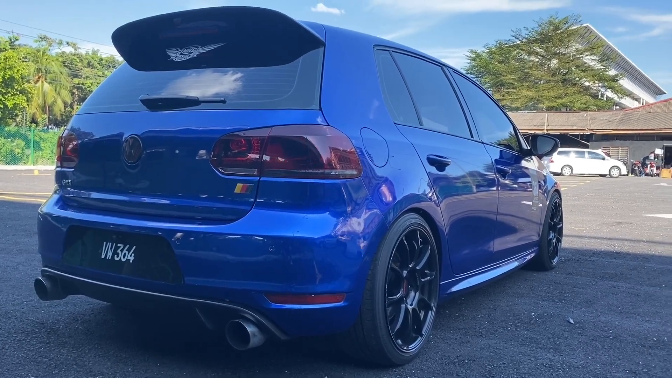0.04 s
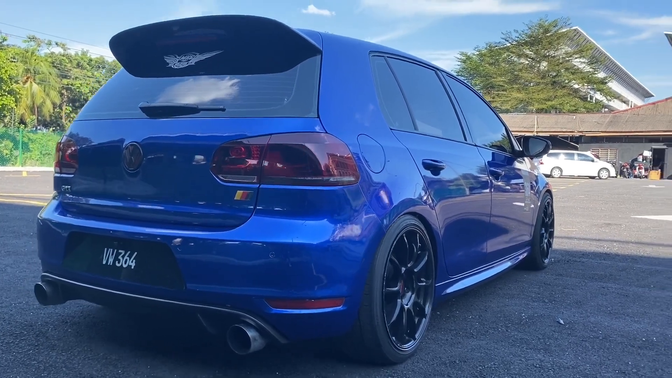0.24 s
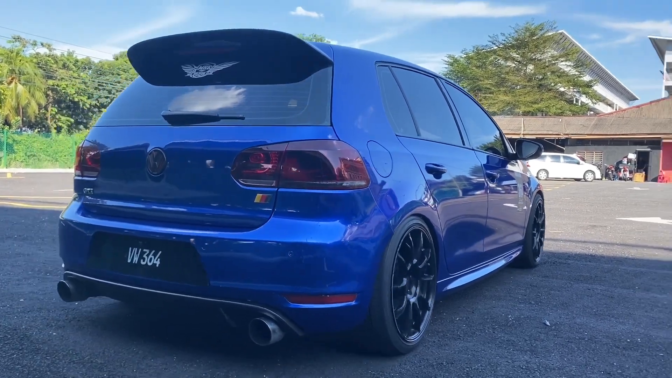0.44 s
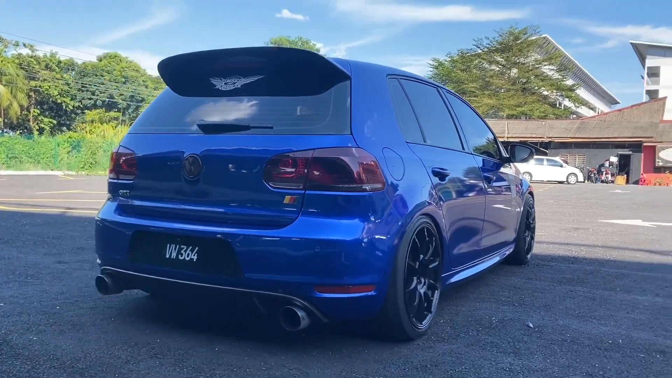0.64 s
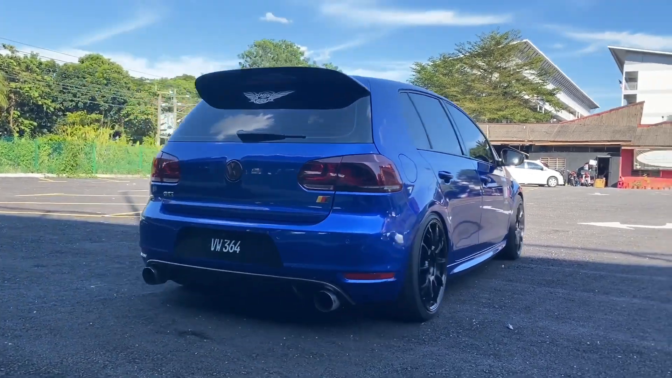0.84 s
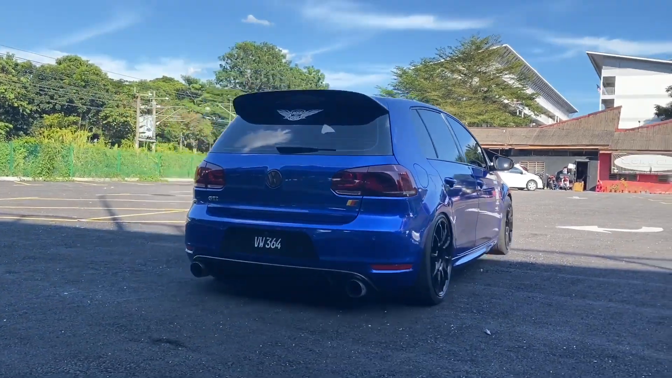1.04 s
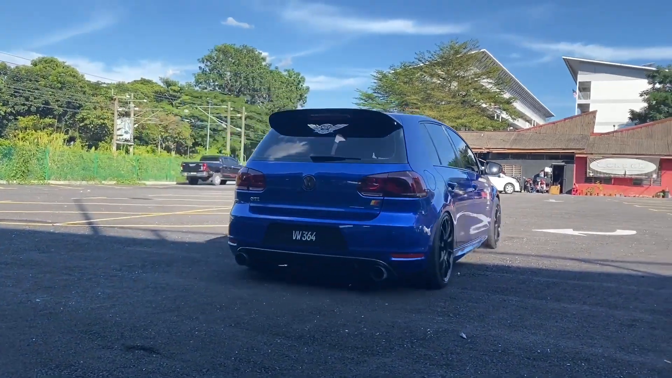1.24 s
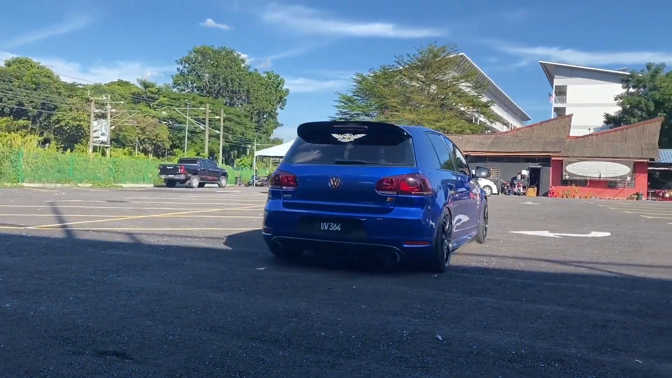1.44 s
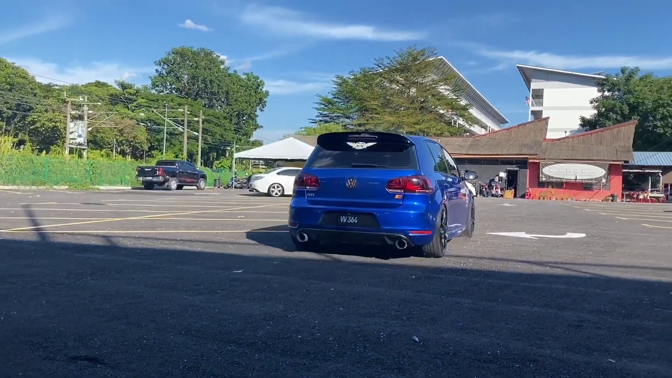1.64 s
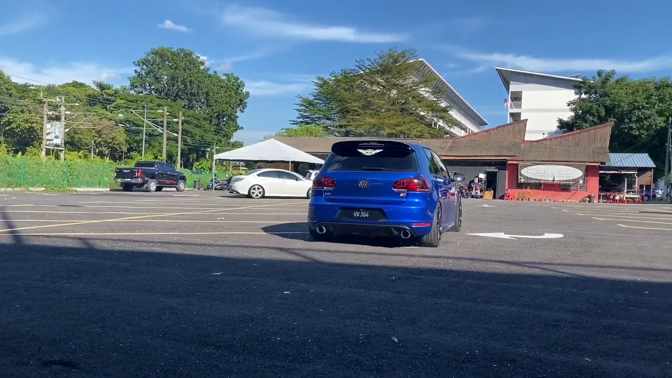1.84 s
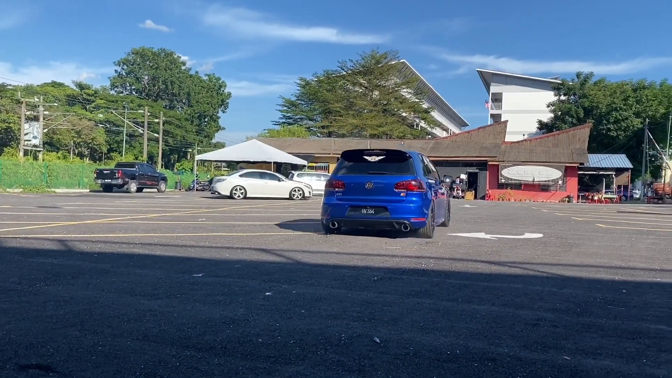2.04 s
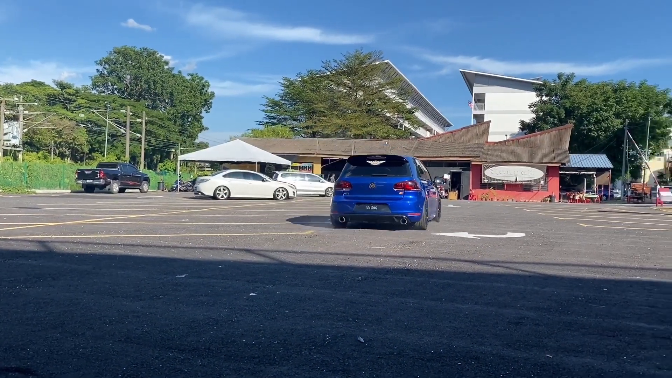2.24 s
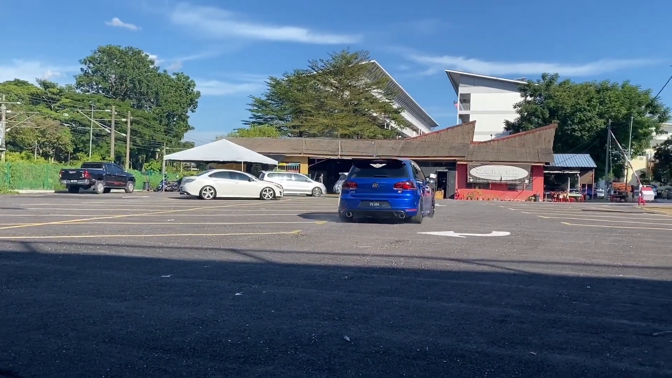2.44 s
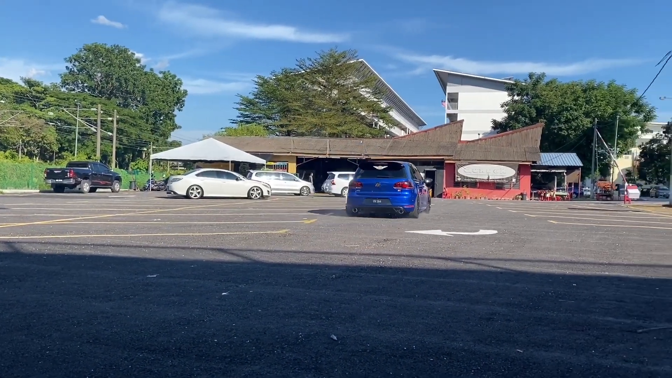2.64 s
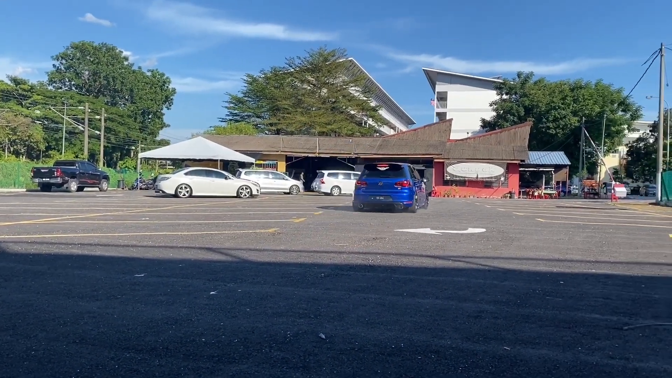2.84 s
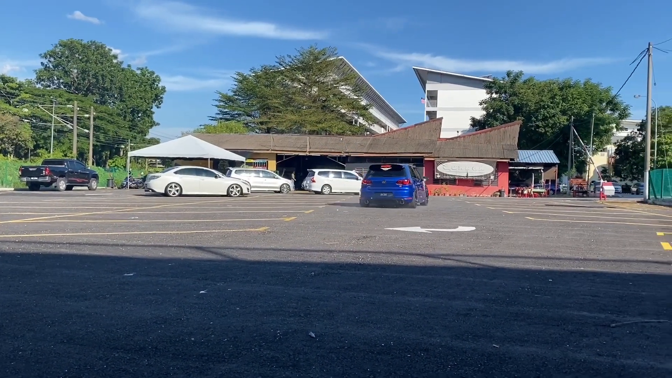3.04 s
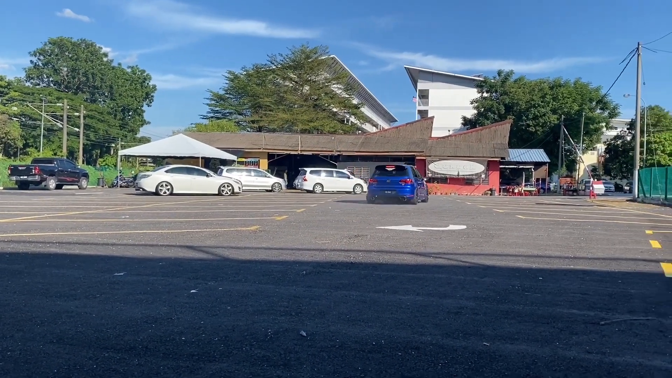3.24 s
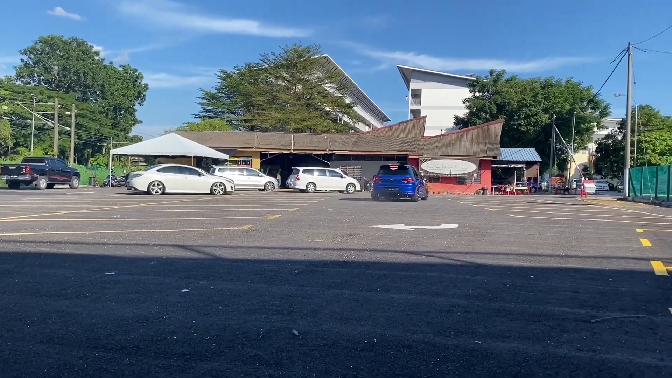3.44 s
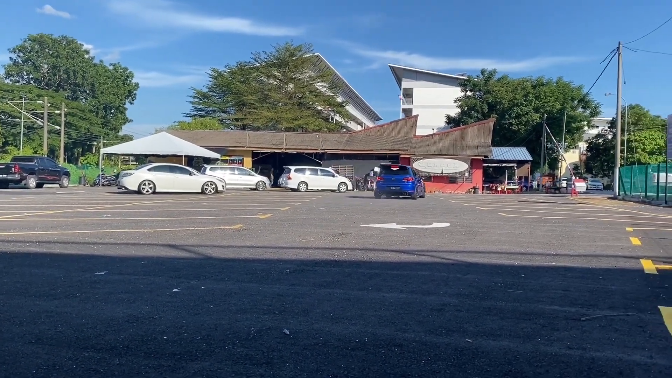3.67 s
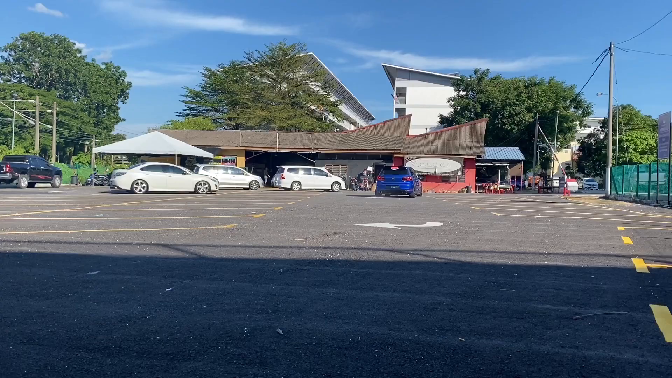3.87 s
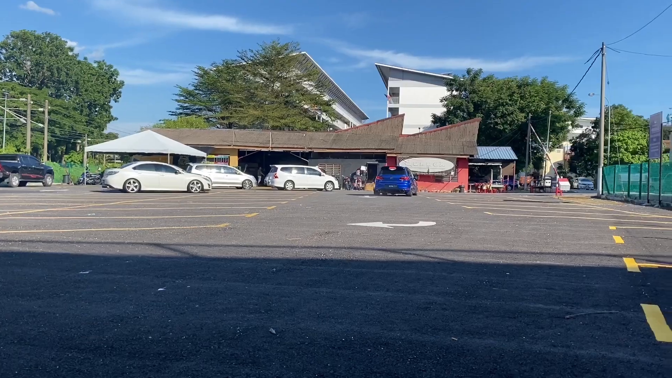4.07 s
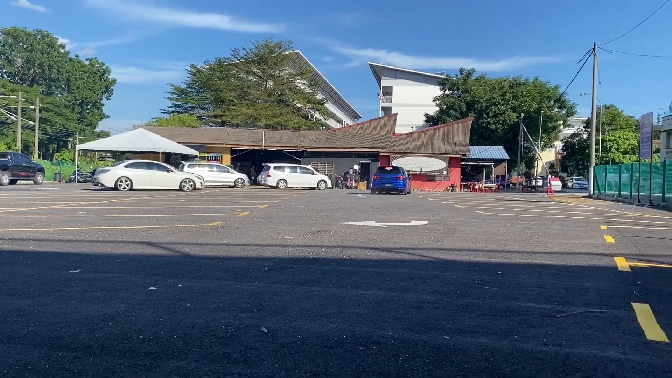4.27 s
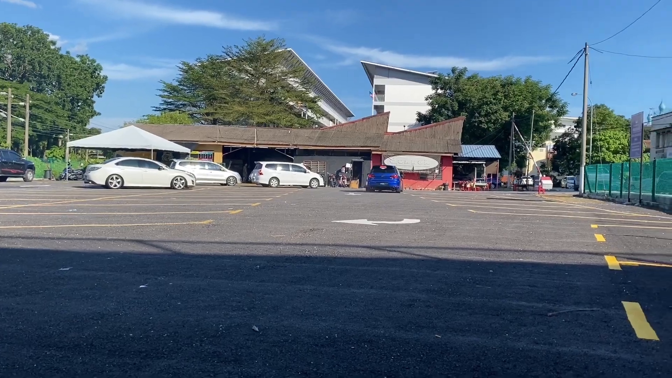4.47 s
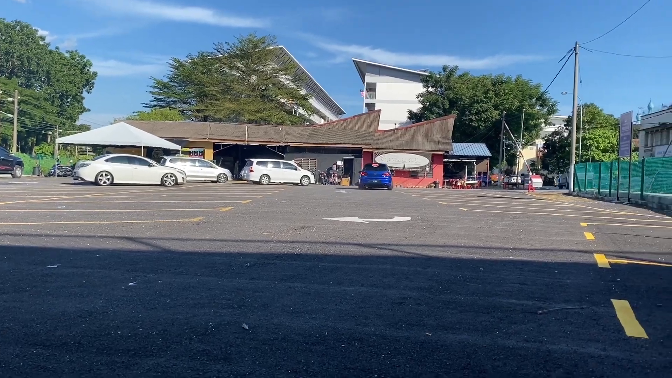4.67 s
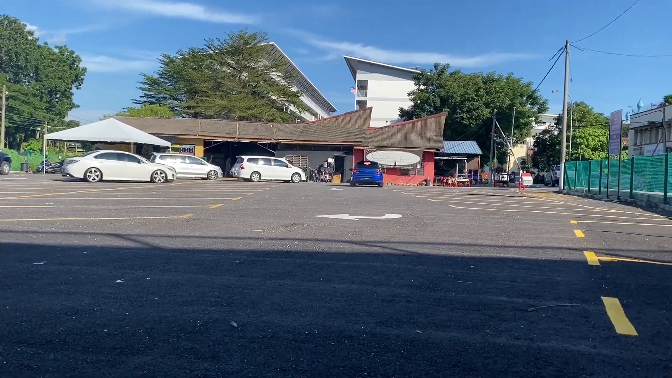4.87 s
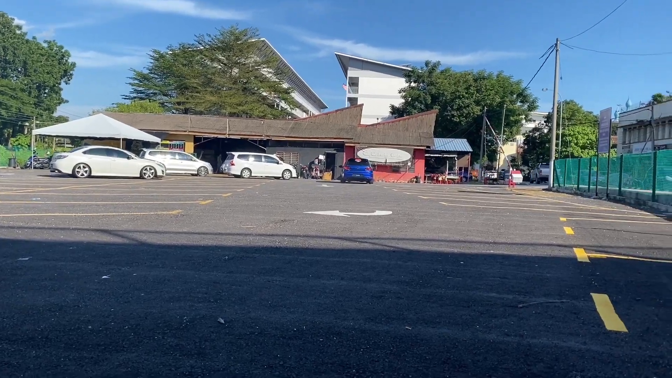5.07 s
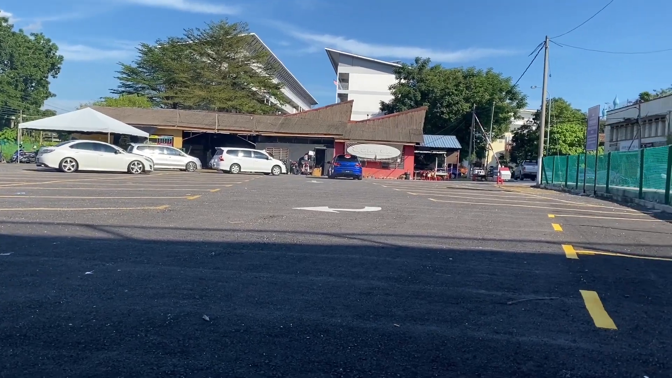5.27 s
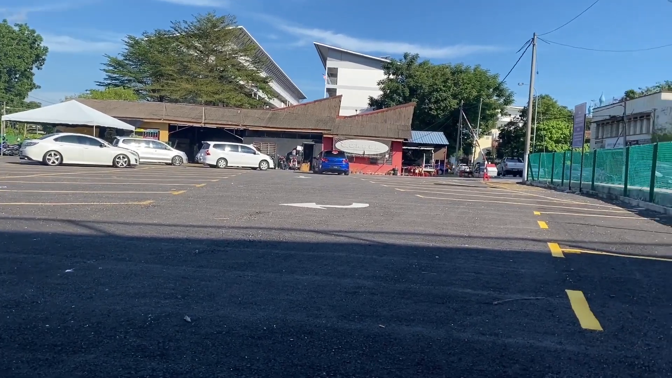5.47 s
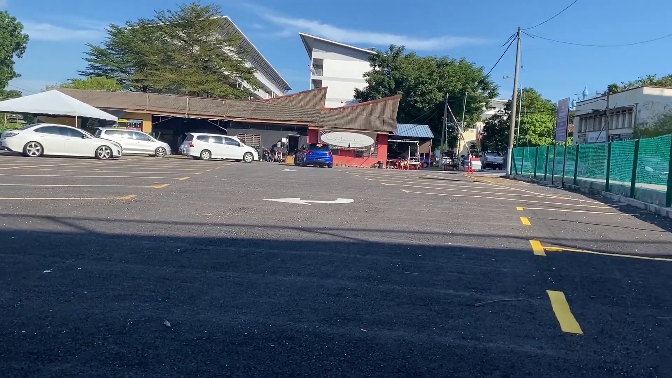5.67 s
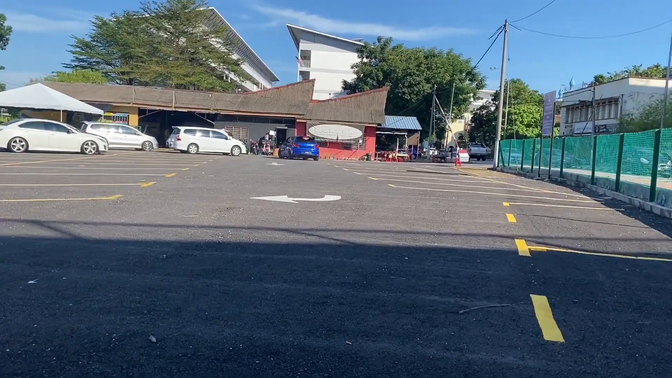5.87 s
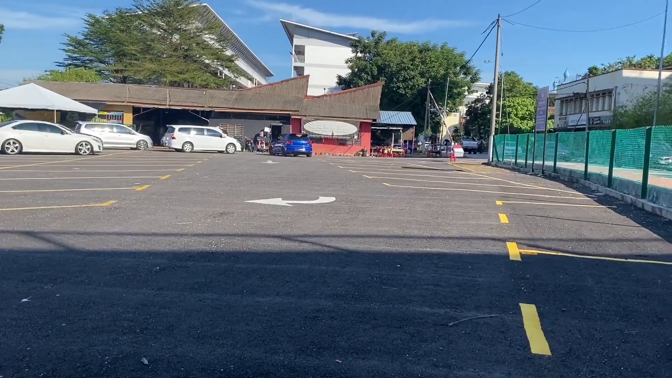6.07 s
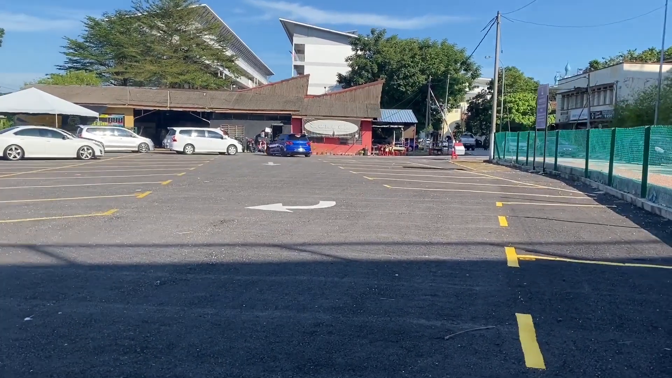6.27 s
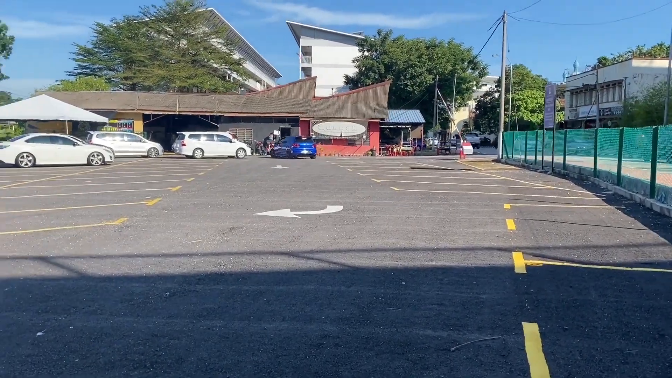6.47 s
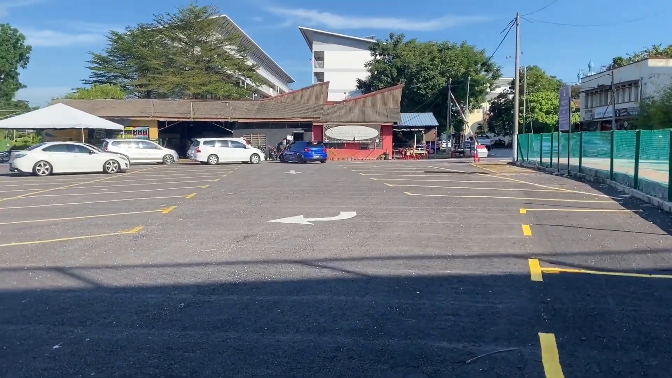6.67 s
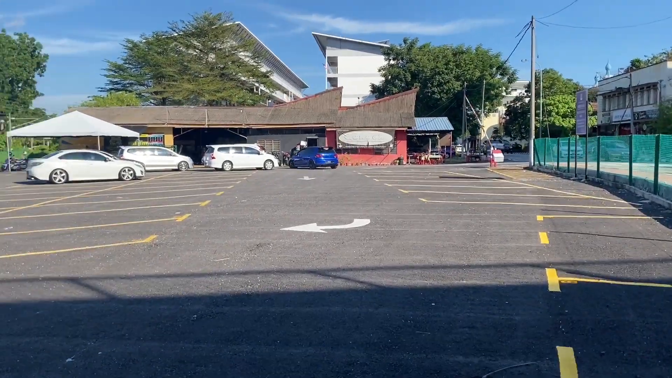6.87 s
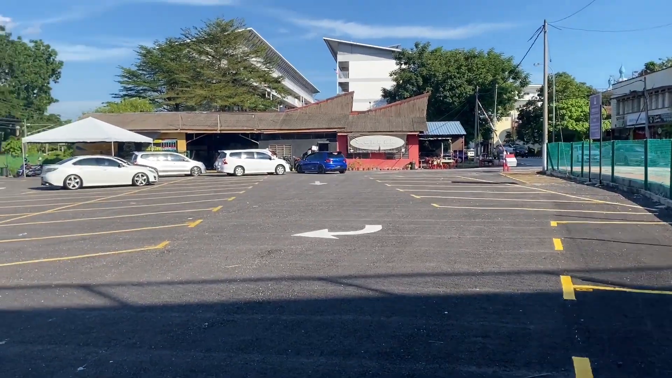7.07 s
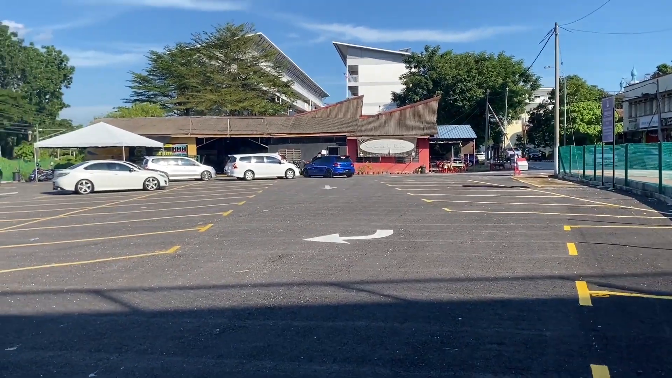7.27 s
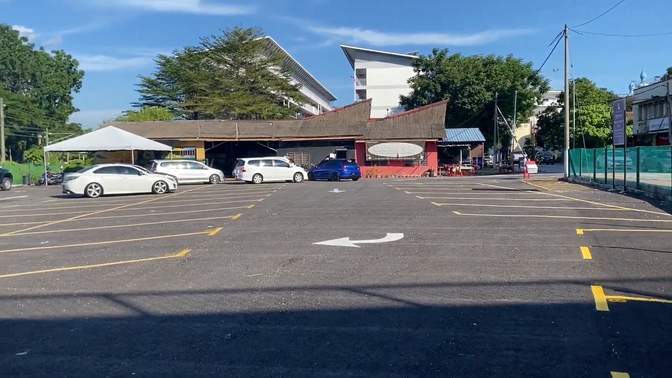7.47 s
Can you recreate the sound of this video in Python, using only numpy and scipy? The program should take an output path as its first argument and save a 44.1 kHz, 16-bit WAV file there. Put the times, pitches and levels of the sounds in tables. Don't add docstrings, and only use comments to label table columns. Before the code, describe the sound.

Outdoors in an open asphalt car park, a handheld phone picks up a four-cylinder turbo car very close. Its open exhaust booms and rasps, spitting gas as revs climb over nearly three seconds and the car recedes. The throttle shuts, the pitch falls into a dull drone with a faint sinking turbo whistle, then a tiny distant idle under soft traffic rumble. A shoe scuffs nearby at the end.

```python
import sys
import numpy as np
from scipy import signal
from scipy.fft import rfft, irfft
from scipy.io import wavfile
from scipy.ndimage import uniform_filter1d

SR = 44100
rng = np.random.default_rng(int(sys.argv[2]) if len(sys.argv) > 2 else 0)


def master_out(mix):
    frames = np.transpose(np.atleast_2d(mix))
    ceiling = np.clip(frames, -1, 1)
    pcm = np.round(ceiling * 32767).astype(np.int16)
    wavfile.write(sys.argv[1], SR, pcm)


def to_linear_factor(level_db):
    exponent = np.asarray(level_db, float) / 20
    return 10 ** exponent


N = 331214
T = np.arange(N) / SR
HZ = np.fft.rfftfreq(N, 1 / SR)
SWING_S, LIFT_OFF_S = (0.69, 1.1), (3.1, 4.3)

# (time [s], gas gating [0-1], clean pulse share [0-1])
CRISP = [
    (0, .6, .42),
    (.25, .78, .45),
    (.6, .82, .62),
    (1., .75, .62),
    (1.4, .62, .62),
    (2.2, .52, .7),
    (2.9, .45, .45),
    (3.4, .25, .1),
]
# (middle [s], length [s], rasp [dB], jet [dB])
SURGES = [
    (0.37, .1, 4, -3),
    (0.794, 0.21, 3.5, 5),
    (.98, 0.057, -2, 10),
    (1.108, 0.12, 0, 6.5),
    (1.236, 0.51, 10.5, 7),
    (1.7, 0.12, 7.5, 4),
    (1.852, .04, 6, 11.5),
]


def curves(table):
    s, *columns = np.transpose(table)
    return [np.interp(T, s, c) for c in columns]


def over_hz(table):
    f, v = np.transpose(table)
    return np.interp(np.log(HZ + 1), np.log(f + 1), v)


def unit(x):
    return x / np.sqrt(np.mean(x ** 2))


def colour(x, table):
    return unit(irfft(rfft(x) * to_linear_factor(over_hz(table)), N))


def noise():
    return rng.standard_normal(N)


def walk(rate):
    k = int(SR / rate)
    steps = np.repeat(rng.standard_normal(N // k + 1), k)
    return unit(uniform_filter1d(uniform_filter1d(steps, k), k)[:N])


def flicker(x, depth_db, rate):
    f, t, z = signal.stft(x, SR, nperseg=512)
    band = np.clip(3 * np.log2(f / 60 + 1), 0, 24).astype(int)
    at = np.minimum((t * SR).astype(int), N - 1)
    wander = np.array([walk(rate)[at] for _ in range(25)])
    return signal.istft(z * to_linear_factor(depth_db * wander[band]), SR)[1][:N]


def ramp(span):
    return np.interp(T, span, [0, 1])


def hold(db, span):
    return to_linear_factor(db) * np.interp(T, span, [0, 1, 1, 0]) ** 2


def bell(middle_s, length_s):
    return np.exp(-(2 * (T - middle_s) / length_s) ** 2)


def boom(turns, hz, tone_db, flow_db):
    # (frequency [Hz], level [dB])
    pipe_near = [(185, -4.5), (220, -5), (277, 16.5), (302, 3), (372, 8.5), (415, -0.5), (556, -1),
                 (650, -8)]
    pipe_far = [(120, 18), (210, 8.5), (300, 10.5), (390, 15), (460, 9), (700, 4), (820, -17), (1200, -15)]
    far_multiple_db = [0, -5.5, -7, -9.5, -12.5]
    ring_hz, ring_width_hz = 277, 90
    far, shut = ramp(SWING_S), ramp(LIFT_OFF_S)

    def read(table, f):
        table_hz, table_db = np.transpose(table)
        return np.interp(np.log(f), np.log(table_hz), table_db)

    def pipe_db(f):
        return flow_db + (1 - far) * read(pipe_near, f) + far * read(pipe_far, f)

    def lag(f):
        return np.arctan2(f * ring_width_hz, ring_hz ** 2 - f ** 2)

    whole_db = [tone_db]
    for k, db in enumerate(far_multiple_db):
        shut_drop_db = (0.99 + 6.5 * (k > 0)) * shut
        whole_db.append(pipe_db((k + 2) * hz) + far * db - shut_drop_db)
    out = np.zeros(N)
    for k, db in enumerate(whole_db):
        multiple = k + 1
        phase = 2 * np.pi * multiple * (turns - .3) - lag(multiple * hz)
        out += to_linear_factor(db + (.5 + 0.36 * k) * walk(12)) * np.cos(phase)

    half_db = -17 + 0.1279 * (hz - 100) - 2.9 * shut
    # (multiple, level [dB])
    for multiple, db in [(.5, -17.5), (1.5, -1.5), (2.5, -5.5), (3.5, -3.5), (4.5, -4.5), (5.5, 2)]:
        level_db = pipe_db(multiple * hz) + half_db + db + 2.4 * walk(12)
        out += to_linear_factor(level_db) * np.sin(2 * np.pi * (multiple * turns + rng.random()))
    return np.sqrt(2) * out * (1 - ramp((5.06, 5.2)))


def idle():
    # (middle [s], length [s], level [dB])
    idle_swells = [
        (5.097, 0.09, -38.5),
        (5.23, .1, -39.5),
        (5.401, 0.17, -37),
        (5.528, .1, -45.5),
        (5.789, .3, -38.5),
        (6.086, 0.53, -47.5),
        (6.815, 0.24, -38.5),
        (7.412, 0.34, -35),
    ]
    swell = to_linear_factor(-52.5) + sum(to_linear_factor(db) * bell(s, length_s) for s, length_s, db in idle_swells)
    turns = np.cumsum(63 + 1.84 * walk(6.4)) / SR
    return np.sqrt(2) * swell * ramp((4.9, 5.05)) * np.sin(2 * np.pi * turns)


def bounce(x, scale):
    # (time [s], spacing of the notches [Hz], share of the copy [0-1])
    asphalt = [
        (0, 681, 0.3),
        (.5, 702, 0.45),
        (1.1, 923, 0.6),
        (1.6, 1260, 0.09),
        (2.1, 1230, 0),
        (2.6, 1400, 0),
    ]
    spacing_hz, share = curves(asphalt)
    share = np.clip(share * scale, 0, 1)
    return (x - share * np.interp(T - 1 / spacing_hz, T, x)) / np.sqrt(1 + share ** 2)


def rasp(pulses, gate, gas_db):
    # (frequency [Hz], level [dB])
    rasp_spectrum = [(450, -71.5), (620, 2), (700, -1), (857, 4), (947, -5.5), (1160, -6.5), (1280, -17.5),
                     (1500, -13), (1950, -41.5), (3300, -120)]
    clean = curves(CRISP)[1]
    db = gas_db + 2 - 1.5 * (1 - ramp(SWING_S)) - 9.5 * ramp(LIFT_OFF_S) - 1.0 * T
    db = db + sum(rasp_db * bell(s, length_s) for s, length_s, rasp_db, _ in SURGES)
    mix = clean * pulses + (1.25 - clean) * gate * noise()
    return to_linear_factor(db) * bounce(colour(mix, rasp_spectrum), .85)


def gas(gate, gas_db):
    # (frequency [Hz], level [dB])
    gas_beside = [(710, -42.5), (1200, -3), (1290, -7), (1460, -36.5), (1620, 5.5), (1890, -7.5),
                  (2080, 8.5), (2250, 4.5), (2570, -6.5), (2800, 8), (3050, -7.5), (3780, -0.5),
                  (4580, -27.5), (4800, -11), (6240, -48), (10600, -120)]
    gas_turn = [(710, -8.5), (1200, 5), (1280, -36), (1640, -2.5), (1800, -9), (2130, -1), (2320, -2.5),
                (2970, -2.5), (3760, 2), (4430, -17.5), (4800, -10.5), (6240, -35), (10600, -120)]
    gas_far = [(650, -28.5), (1100, -11.5), (1190, 2), (1300, -8), (1440, 1.5), (1680, -12), (1940, -4),
               (2220, -14), (2470, 1), (2710, -11), (4040, -10), (4800, -22), (6240, -52), (10600, -120)]
    gas_coast = [(650, -46), (1100, -14.5), (1250, -7.5), (1340, -3.5), (1670, -8), (1850, 0), (2150, -12),
                 (2420, -8.5), (2710, -15.5), (3570, -11), (3970, -20), (4800, -28.5), (6240, -62.5),
                 (10600, -120)]
    spit = gate * noise()
    turn, far, coast = ramp([.4, .9]), ramp([1.5, 2.]), ramp([2.8, 3.2])
    beside = bounce(colour(spit, gas_beside) * (1 - turn) + colour(spit, gas_turn) * turn, 0.72)
    down_axis = colour(spit, gas_far) * (1 - coast) + colour(spit, gas_coast) * coast
    return to_linear_factor(gas_db) * flicker(beside * np.sqrt(1 - far) + down_axis * np.sqrt(far), 1.8, 14)


def jet(gate, gas_db):
    # (frequency [Hz], level [dB])
    jet_spectrum = [(2530, -7), (4300, 5), (4640, -5.5), (5050, 3.5), (6030, 2.5), (7630, -9.5),
                    (8540, -34), (9020, -16.5), (9560, -21.5), (10800, -26.5), (12000, -49.5), (13900, -36),
                    (15500, -44)]
    db = gas_db - 9 - 11.5 * ramp((2.85, 3.6)) - 0.56 * T
    db = db + sum(jet_db * bell(s, length_s) for s, length_s, _, jet_db in SURGES)
    hiss = flicker(colour(gate ** .4 * noise(), jet_spectrum), 2.2, 12)
    return to_linear_factor(db) * to_linear_factor(1.5 * walk(9)) * hiss


def overrun_drone(pulses):
    drone = colour(pulses + .85 * noise(), [
        (90, -60), (150, -15), (245, -17), (295, -3), (335, 0), (375, -8), (470, -22), (560, -16),
        (660, -30), (1500, -110)])
    return hold(-42.5, (3.75, 4.15, 4.95, 5.5)) * drone


def exhaust(turns, hz, gas_db):
    cylinder_db = [3, -3, 0, -2.5]
    share = curves(CRISP)[0]
    firing = turns.astype(int)
    count = firing[-1] + 2
    chance = rng.standard_normal((count, 2)).T
    size_db = 1.8 * chance[0] + np.resize(cylinder_db, count)
    pulses = np.diff(firing, prepend=0) * to_linear_factor(size_db[firing]) * np.sqrt(SR / hz)
    since = (turns - .1) % 1
    spit_db = np.interp(T, [.8, 1.2], [1.2, 2.0]) * chance[1][(turns + .9).astype(int)]
    puff = (1 - np.exp(-since / .03)) * np.exp(-since / .2) * to_linear_factor(spit_db)
    gate = 1 - share + share * unit(puff)
    gate = gate / np.sqrt(uniform_filter1d(gate ** 2, SR // 10))
    fade = 1 - ramp((5.3, 5.4))
    flow = rasp(pulses, gate, gas_db) + gas(gate, gas_db) + jet(gate, gas_db)
    return fade * flow + overrun_drone(pulses)


def smear(flow_db):
    low = colour(noise(), [(30, -24.0), (70, -4), (150, -12), (300, 11.5), (450, 10.0), (700, -9.5),
                           (1600, -89.5)])
    db = flow_db - 5 + 2.6 * np.minimum(T, 2.5) - 4 * ramp(LIFT_OFF_S)
    return to_linear_factor(db) * flicker(low, 2.8, 11)


def turbo():
    late = T - 3.68
    whistle_hz = np.minimum(7100 * 2 ** (-late / 1.7), SR / 4)
    db = -69 + np.minimum(110 * late, -11 * late)
    breath = to_linear_factor(3.0 * walk(13)) * walk(900)
    return to_linear_factor(db) * breath * np.sin(2 * np.pi * np.cumsum(whistle_hz) / SR)


def tyres():
    hiss = colour(noise(), [(5000, -39), (7500, 4), (8500, -12), (9200, 3.5), (11000, -8), (13500, -12),
                            (15500, -12)])
    return hold(-62.5, (.9, 1.2, 2.75, 3.7)) * flicker(hiss, 3.6, 11)


def brakes():
    # (middle [s], length [s], pitch [Hz], level [dB])
    rubs = [
        (4.35, .5, 2330, -63.5),
        (4.82, 0.26, 3480, -67),
        (5.2, 0.2, 2900, -69),
    ]
    out = np.zeros(N)
    for s, length_s, hz, db in rubs:
        band = [(hz / 1.5, -45), (hz / 1.12, -8), (hz, 0), (hz * 1.12, -8), (hz * 1.5, -45)]
        out += to_linear_factor(db) * bell(s, length_s) * colour(noise(), band)
    return out


def grit():
    # (time [s], peak level [dB])
    snaps = [
        (2.1994, -49),
        (2.9243, -51.5),
        (3.073, -54.5),
        (3.385, -52.5),
        (5.8564, -61.5),
        (7.283, -55),
    ]
    envelope = np.zeros(N)
    for s, db in snaps:
        late = np.maximum(T - s, 0)
        envelope += to_linear_factor(db + 4) * (1 - np.exp(-late / .004)) * np.exp(-late / .014)
    return envelope * colour(noise(), [
        (500, -78.0), (1500, -25.5), (4000, -2), (8000, -3), (11000, -6.5), (13500, -3.5), (15000, -8),
        (16000, -42.5)])


def scuff():
    # (middle [s], length [s], level [dB])
    catches = [
        (7.284, 0.021, 8),
        (7.346, .03, 7.5),
        (7.395, .04, 3.5),
    ]
    rub = colour(noise(), [(1200, -73.5), (2500, -27), (4500, -6), (5500, -1.0), (7000, -9), (10500, -21),
                           (12000, -33)])
    catch = to_linear_factor(sum(db * bell(s, length_s) for s, length_s, db in catches))
    return hold(-57.5, (7.06, 7.16, 7.499, 7.7)) * catch * flicker(rub, 2.2, 28)


def town():
    # (frequency [Hz], level [dB])
    rumble_spectrum = [(12, -52), (20, -32), (41, -11), (64, -3), (92, -5.5), (151, -3), (255, -20),
                       (282, -19), (325, -19.5), (445, -34), (600, -27), (780, -60.5), (1320, -120)]
    hiss_spectrum = [(180, -36.5), (300, -7.5), (360, -3), (446, -10), (484, -10), (720, -6.5),
                     (1700, -10.5), (1970, -16), (6150, -24), (11100, -38), (12300, -45.5), (15500, -42)]
    swell = ramp((3.95, 7.4)) ** 1.8
    rumble = flicker(colour(noise(), rumble_spectrum), 1.8, 7)
    hiss = flicker(colour(noise(), hiss_spectrum), .8, 6)
    treble = signal.sosfilt(signal.butter(2, 4000, "high", fs=SR, output="sos"), hiss)
    hiss = hiss + (to_linear_factor(-1.5 + 1.7 * walk(1.8)) - 1) * treble
    passer = colour(noise(), [(600, -74), (1100, -21.5), (1550, -5.5), (1750, 0.5), (2000, -7.0),
                              (2600, -22.5), (5000, -101.5)])
    passer = hold(-55, (6.401, 6.52, 6.6, 7.2)) * passer
    return to_linear_factor(-37 + 2.5 * swell) * rumble + to_linear_factor(-57.5 + 9.5 * swell) * hiss + passer


def ports(x, table):
    tilt, side_db = over_hz(table[0]) / 2, over_hz(table[1])
    lag = np.cumsum(.11 * rng.standard_normal(len(HZ)))
    mid = rfft(x)
    side = mid * np.exp(1j * (lag + np.pi / 2)) * to_linear_factor(side_db)
    return np.array([irfft((mid + s * side) * to_linear_factor(s * tilt), N) for s in (1, -1)])


def scene():
    # (time [s], firing rate [Hz])
    revs = [(0, 90.6), (.11, 101.8), (.33, 91.66), (.67, 100.9), (1.05, 108.4), (1.22, 113.9), (1.45, 129),
            (1.94, 160.9), (2.38, 192.8), (2.64, 208.5), (2.78, 211.4), (2.95, 196.2), (3.26, 144),
            (3.5, 136.2), (3.62, 123.5), (4.01, 107.6), (4.3, 85.8), (4.85, 61.8)]
    # (time [s], firing tone [dB], exhaust flow [dB])
    loudness = [(0, -24, -35), (.04, -16.5, -23), (.14, -13.5, -22.5), (.4, -18.5, -26.5),
                (.7, -19.5, -29.5), (1.05, -18, -34), (1.45, -19, -37), (1.85, -15, -35),
                (2.1, -19.5, -36.5), (2.6, -27.5, -38), (2.78, -28.5, -41), (2.96, -39, -42),
                (3.3, -24, -55), (3.56, -30.5, -59), (3.72, -31, -53), (4.3, -37, -56.5),
                (4.85, -34.5, -64.5), (5.2, -46.5, -57)]
    # (frequency [Hz], difference [dB])
    car_ports = [
        [(60, -1), (110, 1), (200, 0.5), (380, 1.5), (700, 1), (1290, 3.5), (2380, 1), (4400, 3.5), (8120, 2.5), (15000, -6)],
        [(60, -26), (110, -26.5), (200, -30), (380, -12.5), (700, -8), (1290, -4.5), (2380, -4.5), (4400, -4), (8120, 1), (15000, -1.5)],
    ]
    town_ports = [
        [(60, 0.5), (110, 1.0), (200, 1.1), (380, 0.0), (700, -1.5), (1290, -0.74), (2380, -1.2), (4400, 1.5), (8120, 1.5), (15000, 0.0)],
        [(60, -26.5), (110, -22), (200, -13), (380, -6), (700, 0.5), (1290, -1.5), (2380, -17), (4400, -17), (8120, -2.5), (15000, -1)],
    ]
    hz = curves(revs)[0]
    tone_db, flow_db = curves(loudness)
    turns = np.cumsum(hz * (1 + .003 * walk(24.74))) / SR
    car = boom(turns, hz, tone_db, flow_db) + idle() + exhaust(turns, hz, flow_db) + smear(flow_db)
    car = car + turbo() + tyres() + brakes() + grit()
    return ports(car, car_ports) + ports(scuff() + town(), town_ports)


def top_cut(x):
    return signal.sosfilt(signal.butter(12, 16150, fs=SR, output="sos"), x)


def record(dry):
    # (frequency [Hz], level [dB])
    phone = [(20, -2), (40, 0.5), (7900, 0), (8300, -.5), (8800, -1), (9100, -1), (11200, 2.5),
             (11700, -19.5), (12900, -24), (13300, -1), (15000, 0.5), (15400, -51)]
    ceiling = .98
    heard = irfft(rfft(dry) * to_linear_factor(over_hz(phone)), N)
    mix = ceiling * np.tanh(1.085 * heard / ceiling)
    return top_cut(mix)


dry = scene()
out = record(dry)
master_out(out)
```